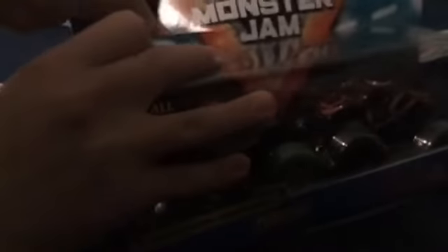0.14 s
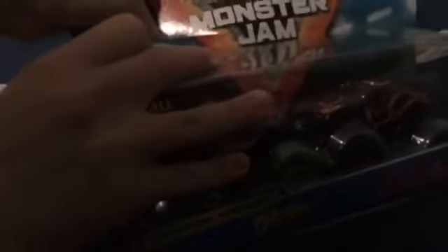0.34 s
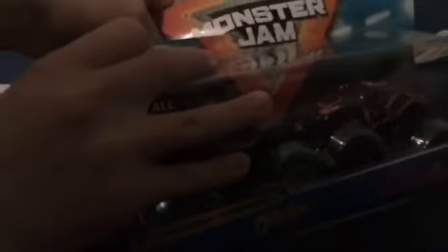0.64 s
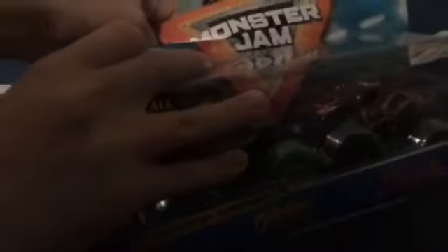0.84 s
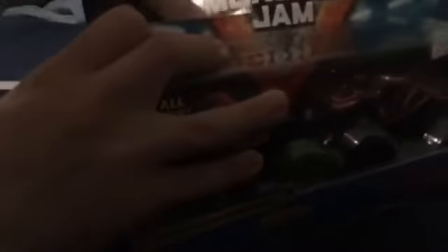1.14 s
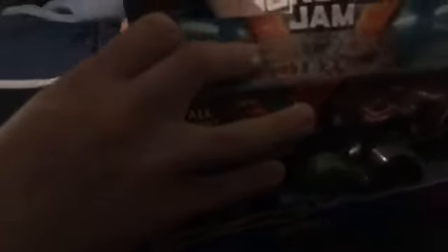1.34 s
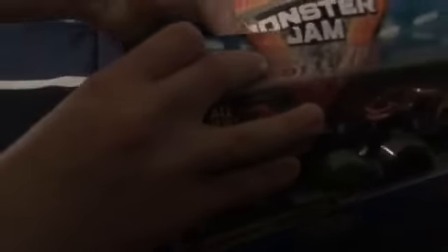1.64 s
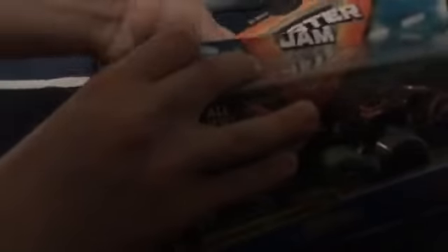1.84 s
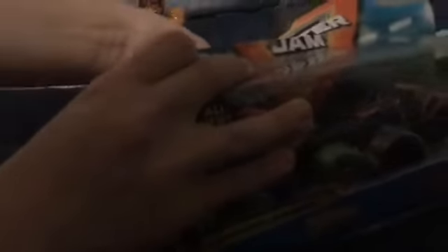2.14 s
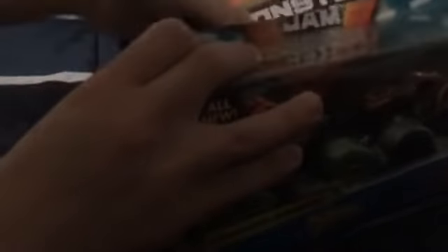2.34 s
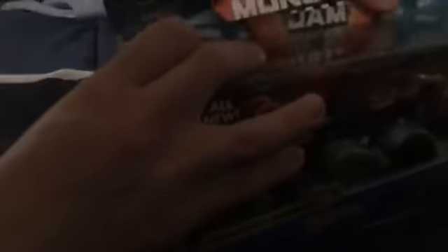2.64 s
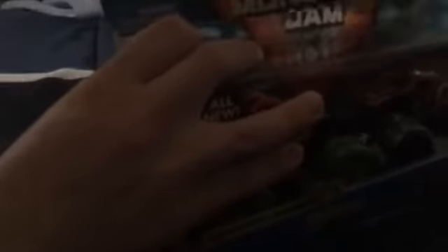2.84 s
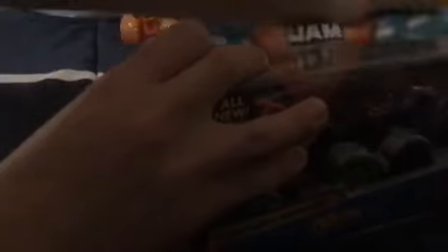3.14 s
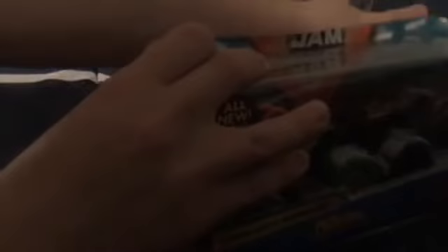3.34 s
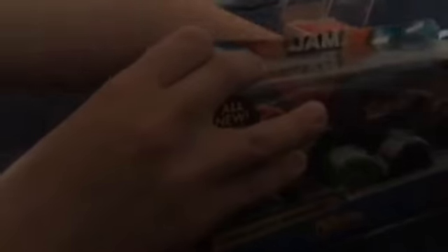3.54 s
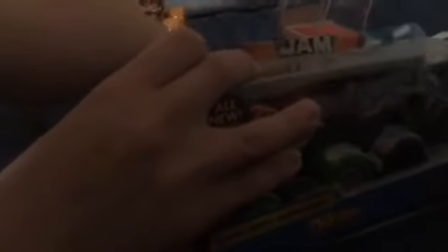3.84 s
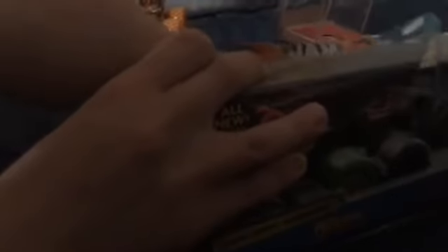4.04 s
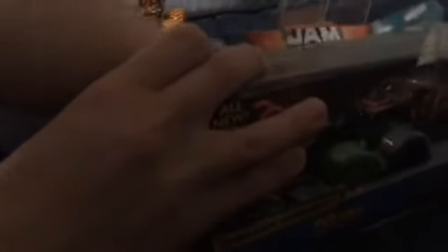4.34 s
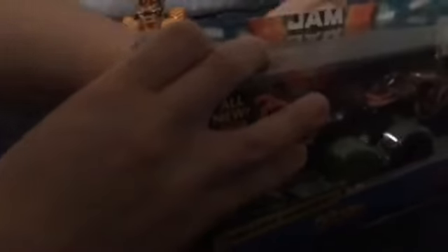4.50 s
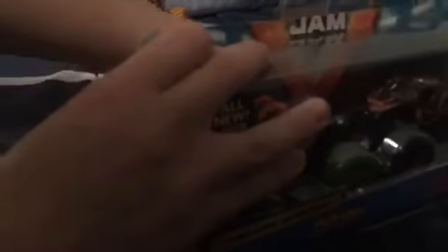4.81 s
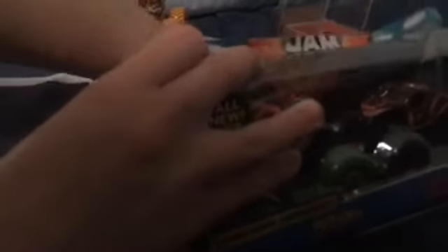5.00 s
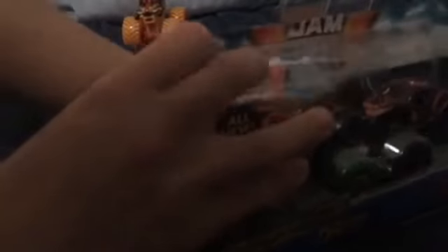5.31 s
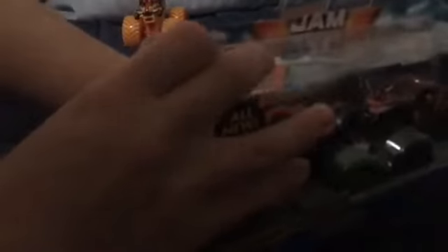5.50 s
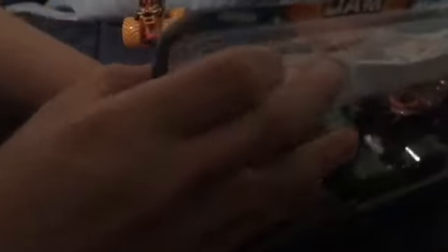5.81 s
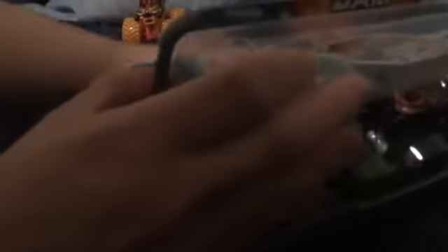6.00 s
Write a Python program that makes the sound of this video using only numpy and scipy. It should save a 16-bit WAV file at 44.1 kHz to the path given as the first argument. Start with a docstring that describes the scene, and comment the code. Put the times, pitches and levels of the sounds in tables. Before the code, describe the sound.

Close plastic crinkle and cardboard rubbing, quiet at first, then loud hollow pops as the packaging buckles under someone's hands.

```python
"""A stiff plastic tray is prised by hand out of a cardboard box, close to a small microphone in a soft room.
Each buckle of the plastic snaps (short noise bursts) and sets the hollow box drumming (damped modes).
Between the snaps tray and fingers rub along the card: random slips drive the box modes as a rumble
and hiss in fine grains through the noise bands of the tray; a short rustle also follows a loud snap.
A few faint squeaks are narrow-band friction."""
import sys
import numpy as np
from scipy import signal
from scipy.io import wavfile

SR = 44100
rng = np.random.default_rng(int(sys.argv[2]) if len(sys.argv) > 2 else 0)


def master_out(mix):
    """Clip the mix to full scale and print it as 16-bit PCM to the path in sys.argv[1]."""
    frames = np.transpose(np.atleast_2d(mix))
    ceiling = np.clip(frames, -1, 1)
    pcm = np.round(ceiling * 32767).astype(np.int16)
    wavfile.write(sys.argv[1], SR, pcm)


N = 271656

# Chance events: level above the rustle (snaps) or above the push (thumps)
SMALL_SNAP_DB, SMALL_THUMP_DB = 8.5, 1.5
# Their mean colour: crack and tick relative to the walls, boom and big panels relative to the small panels
SMALL_CRACK_DB, SMALL_TICK_DB, SMALL_BOOM_DB, SMALL_BIG_DB = -1, -4.5, 1, -3
# How far a snap's lowest band follows its crack level, and its finest band its tick level
DULL_SHARE, FINEST_SHARE = 0.26, 1.3


def from_db(db):
    """Decibel law: 20 dB is a factor of ten in amplitude."""
    return 10 ** (np.asarray(db) / 20)


def rms_one(x):
    """Normalisation to unit root-mean-square amplitude."""
    return x / np.sqrt(np.mean(x ** 2) + 1e-20)


def band(x, low_hz, high_hz):
    """Band limitation by a Butterworth filter, maximally flat in its passband."""
    high_hz = min(high_hz, .45 * SR)
    return signal.sosfilt(signal.butter(2, [low_hz, high_hz], "band", fs=SR, output="sos"), x)


def ring(force, hz, t60):
    """Damped harmonic oscillator: a unit impulse starts a decaying sine of initial height 1."""
    decay = from_db(-60 / (t60 * SR))
    w = 2 * np.pi * hz / SR
    return signal.lfilter([0, np.sin(w)], [1, -2 * decay * np.cos(w), decay * decay], force + 1e-18)


def drift(rate):
    """Slow random modulation: noise through two equal low-pass poles at rate (Hz), rms 1."""
    r = np.exp(-2 * np.pi * rate / SR)
    noise = rng.standard_normal(N + SR)
    return rms_one(signal.lfilter([1], [1, -2 * r, r * r], noise)[SR:])   # the first second settles the filter


def grains(per_s, spread_db):
    """Stick-slip friction as a random train of tiny slips of uneven size and either sign, rms 1."""
    sizes = from_db(spread_db * np.minimum(rng.exponential(1, N), 4)) * rng.standard_normal(N)
    return rms_one(sizes * (rng.random(N) < per_s / SR))


def in_time(rows):
    """Linear interpolation of each column of a curve, one value a sample."""
    s, *columns = np.transpose(rows)
    return [np.interp(np.arange(N) / SR, s, c) for c in columns]


def slide():
    """Power summation: strokes and after-rustle swell and fade in dB, their powers adding to the rest."""
    # Strokes of the tray on the card, and the short rustle just after a loud snap:
    # start t/s, top t/s, end t/s, rustle level/dB,
    # scrape level/dB and finest-hiss level/dB relative to the rustle.
    # A rise or fall shorter than 5 ms, or an end ahead of the top, counts as 5 ms.
    swells = [(-0.2, 0.085, 0.41, -65, -0.5, -4), (0.145, 0.248, 0.4, -55.5, 2, -8),
              (0.39, 0.467, 0.54, -61, 4, -6), (0.475, 0.595, 0.73, -54, 4.5, -9.5),
              (0.757, 0.875, 1.07, -65, 5, -12), (1.085, 1.184, 1.27, -61.5, 8.5, -22),
              (1.17, 1.272, 1.4, -60, 4, -21), (1.307, 1.417, 1.535, -61.5, 5, -20),
              (1.52, 1.722, 1.81, -58, 3.5, -14.5), (1.733, 1.812, 1.99, -56, 4, -13),
              (1.85, 2.025, 2.29, -63.5, 1, -12), (2.354, 2.487, 2.78, -65.5, 4, -20),
              (2.545, 2.561, 2.6, -53, 6.5, -25), (2.65, 2.73, 3.04, -63, -1, -16),
              (2.836, 2.886, 3.02, -58.5, 1.5, -17), (3.012, 3.041, 3.075, -53.5, 6.5, -31),
              (3.2, 3.257, 3.2, -68, 5, 3), (3.229, 3.308, 3.46, -51, 0.5, -8),
              (3.352, 3.557, 3.73, -53, 2.5, -9), (3.69, 3.786, 3.935, -48.5, 7.5, -5.5),
              (3.8, 4.033, 4.14, -58, 4, -4), (4.097, 4.115, 4.16, -40, 0, -17),
              (4.12, 4.154, 4.223, -54.5, 2, -15.5), (4.261, 4.346, 4.4, -69, 7.5, -8),
              (4.418, 4.511, 4.6, -57.5, 10, -29), (4.443, 4.606, 5.13, -61, -3, -13),
              (4.611, 4.722, 4.85, -63.5, 13, -21), (4.874, 4.995, 5.15, -66, 3.5, -32),
              (5.167, 5.232, 4.8, -60.5, -5, -19.5), (5.201, 5.312, 5.36, -51, 6.5, -14.5),
              (5.3, 5.36, 5.42, -43.5, 13, -12), (5.34, 5.408, 5.46, -46.5, 0, -18),
              (5.66, 5.735, 5.87, -67.5, 0, -9), (5.797, 5.919, 5.87, -71.5, 8.5, -15.5),
              (5.978, 6.088, 6.3, -67, 5, -17)]
    # Level between swells of scrape, rustle, hiss, finest hiss: level/dB
    rest_levels = [-68.5, -77.5, -88, -90]
    edge_db, roundness = 17, 1.16        # drop from the top to the start or end; exponent of the curve
    hiss_db, hiss_share = 0.85, 0.45     # hiss above the rustle; share of the finest hiss's offset added
    t = np.arange(0, N, 64) / SR
    start, top, end, rustle, scrape, finest = np.transpose(swells)[:, :, None]
    before = (top - t) / np.maximum(top - start, .005)
    after = (t - top) / np.maximum(end - top, .005)
    drop_db = edge_db * np.maximum(before, after) ** roundness
    levels = [rustle + scrape, rustle, rustle + hiss_db + hiss_share * finest, rustle + finest]
    curves = []
    for level_db, rest_db in zip(levels, rest_levels):
        power = from_db(2 * rest_db) + from_db(2 * (level_db - drop_db)).sum(axis=0)
        curves.append(np.interp(np.arange(N) / SR, t, 10 * np.log10(power)))
    return curves


def rumble(push_db):
    """Resonance filtering: noise in a low band wavers and swells as the hands push."""
    # Low resonance: f/Hz, width f/Hz, level/dB relative to the boom push
    low_resonance = (63.7, 23.6, -9)
    hz, width, level_db = low_resonance
    noise = rms_one(band(rng.standard_normal(N), hz - width / 2, hz + width / 2))
    return from_db(push_db + level_db + 0.82 * drift(2.3)) * noise


def at_random(rows, follows_db, colour, count, spread_db):
    """Random point process: adds small events at uniform times, as strong as the movement then."""
    draw = rng.random((count, 2 + len(colour)))
    s = draw[:, 0] * (N / SR - .02)
    # the logarithm lets a few events stand out
    db = follows_db[(s * SR).astype(int)] - spread_db * np.log(draw[:, 1] + 0.045)
    colours = colour + 3.3 * (draw[:, 2:] - .5)
    return np.vstack([rows, np.column_stack([s, db, colours])]).T


def box(modes, s, blow_db, rub_db, per_s, soft_hz):
    """Modal superposition: modes struck at times s and driven by rubbing; soft contact lacks treble."""
    slip_turns = 2.13   # a buckle lets go in slips spread over up to this many periods of a mode
    chance = rng.random((len(s), len(modes), 2))
    rubbing = grains(per_s, spread_db=-0.5) * from_db(1.4 * drift(25))
    struck, rubbed = 0, 0
    for k, (hz, level_db, t60) in enumerate(modes):
        sign = (-1) ** k
        # each mode is caught by another slip, at most 7.5 ms late
        late = chance[:, k, 0] * np.minimum(slip_turns / hz, .0075)
        at = ((s + late) * SR).astype(int)
        blows = np.zeros(N)
        np.add.at(blows, at, from_db(blow_db + level_db + 4.07 * chance[:, k, 1]))
        struck = struck + sign * ring(blows, hz, t60)
        # under rubbing the mode decays faster
        rubbed = rubbed + sign * from_db(level_db) * ring(rubbing, hz, t60 * 0.36)
    total = struck + from_db(rub_db) * rms_one(rubbed)
    return signal.sosfilt(signal.butter(3, soft_hz, fs=SR, output="sos"), total)


def plastic(edges, t60, s, blow_db, rub_db, slips):
    """Filtered noise: in one band, snaps are decaying bursts and sliding is a grainy hiss."""
    rise_s = 0.00085   # time constant of the onset
    low_hz, high_hz = edges
    blows = np.zeros(N)
    blows[(s * SR).astype(int)] = from_db(blow_db)
    burst = signal.lfilter([1], [1, -from_db(-60 / (t60 * SR))], blows + 1e-18)
    rise = np.exp(-1 / (rise_s * SR))
    burst = signal.lfilter([1 - rise], [1, -rise], burst)
    force = burst * rng.standard_normal(N) + from_db(rub_db + 1.37 * drift(35)) * slips
    # white noise keeps only this band's part of its power: make up for it
    share = np.sqrt(SR / 2 / (high_hz - low_hz))
    return share * band(band(force, low_hz, high_hz), low_hz / 1.25, high_hz * 1.25)


def sheen(x):
    """Parallel resonances: broad bands of the tray come and go as the grip on it shifts."""
    # Broad resonances of the tray: f/Hz, width f/Hz, mean level/dB relative to the direct sound
    resonances = [(2090, 220, -13.5), (3330, 67, -24), (4490, 1230, -12), (6200, 1500, -12.5),
                  (7670, 2100, -11.5)]
    out = x
    for hz, width, gain_db in resonances:
        out = out + from_db(gain_db + 2.4 * drift(9)) * band(x, hz - width / 2, hz + width / 2)
    return out


def squeaks():
    """Friction-excited resonance: noise caught in one narrow band for a moment."""
    # Squeaks of plastic on card: start t/s, end t/s, f/Hz, peak level/dB of the rms
    squeak_rows = [(2.83, 2.947, 3350, -63.5), (3.007, 3.068, 1450, -50), (5.479, 5.725, 3000, -72.5)]
    t, out = np.arange(N) / SR, 0
    for start, end, hz, level_db in squeak_rows:
        swell = np.sin(np.pi * np.clip((t - start) / (end - start), 0, 1))
        noise = rms_one(band(rng.standard_normal(N), hz * .95, hz * 1.05))
        out = out + from_db(level_db) * swell * noise
    return out


def room(x):
    """Reverberation by convolution: a short dull tail of dense, exponentially decaying reflections."""
    level_db, t60_s, cut_hz = -18, 0.19, 10600
    t = np.arange(SR // 2) / SR
    tail = band(rng.standard_normal(len(t)), 91, cut_hz) * from_db(-60 * t / t60_s)
    tail = tail * (t > .004)   # reflections arrive after 4 ms
    return from_db(level_db) * signal.fftconvolve(x, tail / np.sqrt(np.sum(tail ** 2)))[:N]


def scene():
    """Superposition of the drumming card, the tray's noise, the squeaks and their reflections."""
    # Hands pushing the box about: t/s, boom level/dB, panels level/dB (base levels, offset below)
    push = [(0.0, -49, -55.5), (0.55, -52.5, -53.5), (1.36, -44.5, -50.5), (1.65, -50.5, -50),
            (2.4, -50, -53), (2.56, -46, -49.5), (3.4, -44, -51), (3.71, -45, -38.5), (3.82, -46, -46.5),
            (4.22, -48.5, -52), (4.49, -45.5, -52.5), (4.8, -47, -49), (5.15, -53, -54.5), (5.37, -38, -28),
            (5.49, -47, -52.5), (5.85, -49, -54), (6.16, -54, -56)]
    # The box is knocked or flexes: t/s, small-panels level/dB, air-boom level/dB and
    # big-panels level/dB relative to the small panels (base levels, offset below)
    thumps = [(0.237, -35.5, -13, -10), (0.325, -39, -12, -26), (0.486, -38.5, -10, -7),
              (0.551, -31, -8, -11), (1.147, -38.5, 2, -4), (1.167, -37, -11, 1.5), (1.244, -38.5, 5, -1),
              (1.27, -35, -6, -3), (1.294, -39, 0, -14), (1.316, -38, -12, 3), (1.402, -37, -3, 0.5),
              (1.423, -41, 2, -4), (1.666, -20.5, 0, -8), (1.714, -32.5, -10, -21), (2.091, -16, -12, -2.5),
              (2.109, -32, -11, 7.5), (2.417, -40, -2, -9), (2.476, -40, 3, -15), (2.498, -41, 7, -4),
              (2.564, -34.5, -4, -2), (2.574, -28.5, -7, 1), (2.63, -34, 2, -13), (3.016, -41, 8.5, 6),
              (3.035, -34, 0.5, 7), (3.299, -20.5, 0.5, -5.5), (3.496, -39, -19, -15),
              (3.584, -14, -7.5, -4), (3.683, -22.5, -29, 1), (3.738, -25, -9, -1),
              (3.775, -22, -14, -16.5), (3.782, -25.5, -2.5, 1.5), (3.811, -29.5, 0.5, -11),
              (3.835, -25.5, 2.5, -7), (4.07, -31.5, -3, 0.5), (4.108, -10.5, -5, -6.5),
              (4.124, -21, -15, -8.5), (4.461, -29.5, -9, -24), (4.494, -20, -9, -3.5),
              (4.687, -34.5, -5, -4.5), (4.717, -35, -12, -1), (4.778, -39.5, 2, -5),
              (4.948, -37.5, -4, -17), (5.199, -25.5, -8, 1), (5.239, -34, 0, -1), (5.285, -28.5, -10, -11),
              (5.305, -24, -5, -5), (5.32, -29, -5, -6), (5.335, -8.5, -6.5, -7.5), (5.356, -13, -10, -1.5),
              (5.381, -17.5, -5.5, -19), (5.398, -25, -5, 3.5), (5.727, -33.5, 1.5, -5),
              (5.895, -29, -3.5, -1)]
    # The plastic buckles: t/s, walls level/dB, crack level/dB and tick level/dB
    # relative to the walls (base levels, offset below)
    snaps = [(0.122, -43, -13, -7), (0.235, -33, -3, 2), (0.272, -33, -11, -10), (0.29, -50, 5, -4),
             (0.323, -32.5, -3.5, -11), (0.367, -43.5, -3, -16), (0.417, -45.5, 0, 0), (0.442, -47, -3, -8),
             (0.461, -54, -2, -21), (0.484, -33.5, -3, -9), (0.55, -27.5, -3, -11.5), (0.84, -49, -6, -3),
             (0.907, -50.5, 4, 2), (1.098, -48, -4, -29), (1.165, -25, -22, -26), (1.317, -41.5, -8, -8),
             (1.416, -36, -41, -31), (1.574, -51.5, 3, 0), (1.668, -38, -27, -35), (1.711, -25, -44, -40),
             (1.779, -49.5, 9.5, 8.5), (2.092, -12, -9.5, -50), (2.326, -36, -4.5, -17),
             (2.443, -49.5, 3, -13), (2.473, -38.5, -2, -31), (3.491, -42, 6, -9), (3.586, -13.5, -14, -42),
             (3.683, -24.5, -27, -27), (3.739, -36, -18, -13), (3.777, -22, -1, -13),
             (3.832, -25.5, -5, -25), (4.067, -30.5, -9, -27), (4.107, -7, -4, -13),
             (4.414, -44.5, -17, -26), (4.462, -25.5, -15.5, -46), (4.501, -30, -23, -48),
             (4.687, -36, -15, -27), (4.717, -40.5, -17, -25), (4.737, -40, -14, -25),
             (5.198, -18, -14, -31), (5.232, -37, -5, -25), (5.282, -26, -11, -18), (5.315, -25, -12, -14),
             (5.338, -8, -11, -24), (5.353, -10.5, -2, -16), (5.363, -23, -10, -21), (5.38, -19, -17, -31),
             (5.397, -25, -5, -10), (5.719, -35.5, -10, -7), (5.726, -32.5, -7, -3), (6.057, -46, -8, -26)]
    # Modes of the box, from its air boom to its stiff walls: f/Hz, relative level/dB, struck t60 t/s
    boom_modes = [(98, -6, 0.079), (134.7, 2, 0.073), (182, 2, 0.089), (222.3, -1, 0.081)]
    big_panel_modes = [(299.7, -1, 0.094), (350.4, -2, 0.11), (403, -3, 0.069)]
    panel_modes = [(501, 1.5, 0.032), (565, 1.5, 0.065), (616, 0.5, 0.063), (699, -3.5, 0.03)]
    wall_modes = [(913, -6.5, 0.08), (1063, 5, 0.029), (1239, 4.5, 0.024), (1635, -6, 0.046),
                  (1850, 0, 0.015), (1920, -11.5, 0.046), (2380, -15, 0.016)]
    # Noise bands of the tray (scrape, rustle, hiss, finest hiss): low f/Hz, high f/Hz
    tray_bands = [(1350, 2700), (2500, 5600), (5400, 9600), (10000, 19000)]

    low, mid = in_time(push)
    scrape, rustle, hiss, finest = slide()
    knocked, panel, boom, big = at_random(
        thumps, mid + SMALL_THUMP_DB, [SMALL_BOOM_DB, SMALL_BIG_DB], count=30, spread_db=3.0)
    snapped, wall, crack, tick = at_random(
        snaps, rustle + SMALL_SNAP_DB, [SMALL_CRACK_DB, SMALL_TICK_DB], count=140, spread_db=4.0)

    air = box(boom_modes, knocked, panel + boom - 3, low - 3, per_s=660, soft_hz=462)
    card = band(air, 55, 1100) + rumble(low)
    card = card + box(big_panel_modes, knocked, panel + big - 3, mid - 4, per_s=270, soft_hz=750)
    card = card + box(panel_modes, knocked, panel - 5, mid - 3, per_s=300, soft_hz=1060)
    card = card + box(wall_modes, snapped, wall - 13, scrape - 3.5, per_s=1500, soft_hz=3600)

    # fine grain and lone crackles
    slips = grains(12000, spread_db=1.0) + from_db(-17.5) * grains(250, spread_db=5.5)
    # for each band of the tray: burst t60 (s), snap level (dB), slide level (dB)
    settings = [(0.016, wall + DULL_SHARE * crack - 3, scrape - 7),
                (0.013, wall + crack - 3, rustle),
                (0.0087, wall + tick - 1.5, hiss),
                (0.0031, wall + FINEST_SHARE * tick - 3, finest)]
    noise = 0
    for edges, (t60, snap_db, slide_db) in zip(tray_bands, settings):
        noise = noise + plastic(edges, t60, snapped, snap_db, slide_db, slips)
    dry = card + sheen(noise) + squeaks()
    return (dry + room(dry))[None]


def record(dry):
    """Transducer response: a small capsule drops deep bass and lifts high treble; peaks saturate, top is cut."""
    low_cut_hz, stop_hz = 44.4, 16150   # from stop_hz up the last filter takes off at least 60 dB
    top_hz, top_db = 12100, -2          # treble band added on top, relative to the direct sound
    overload = 1                        # height at which peaks level off
    x = signal.sosfilt(signal.butter(6, low_cut_hz, "high", fs=SR, output="sos"), dry)
    x = x + from_db(top_db) * band(x, top_hz, .45 * SR)
    x = overload * np.tanh(x / overload)
    return signal.sosfilt(signal.cheby2(24, 60, stop_hz, fs=SR, output="sos"), x)


dry = scene()
out = record(dry)
master_out(out)
```